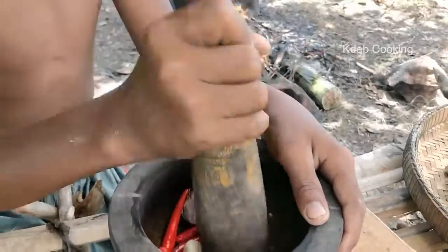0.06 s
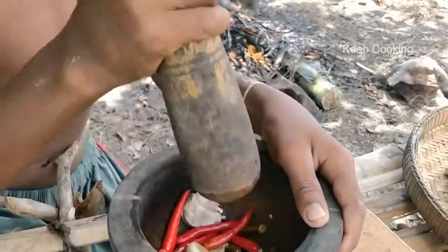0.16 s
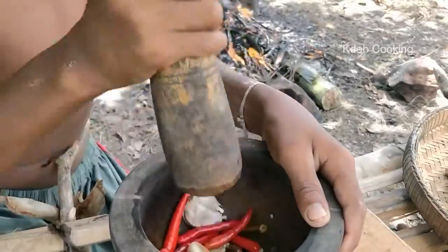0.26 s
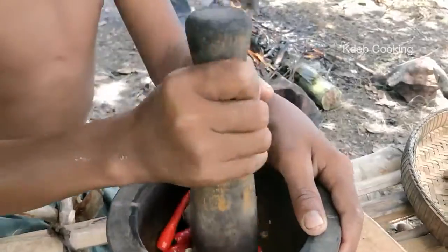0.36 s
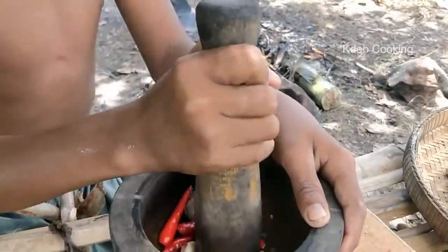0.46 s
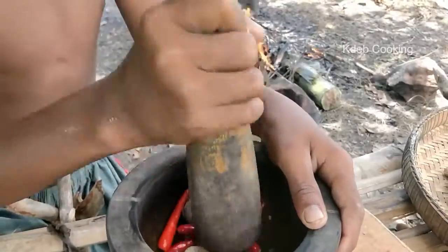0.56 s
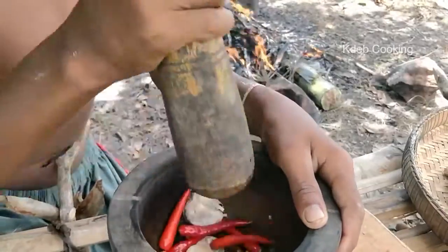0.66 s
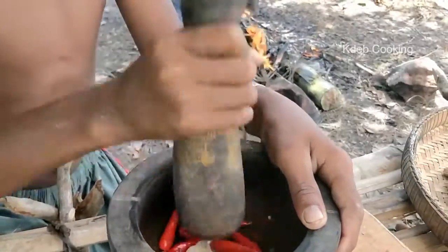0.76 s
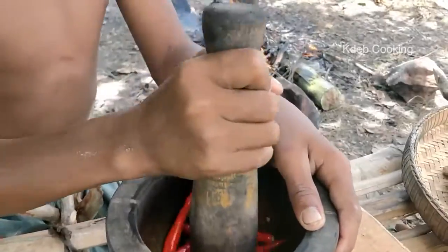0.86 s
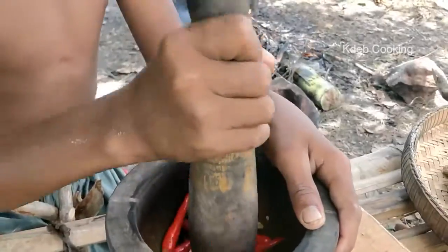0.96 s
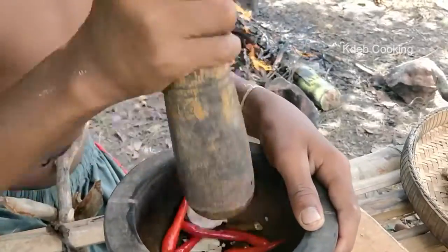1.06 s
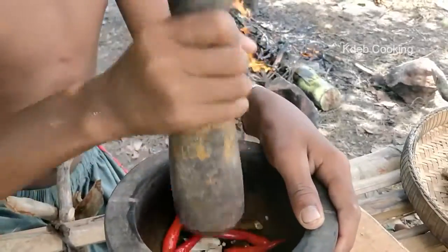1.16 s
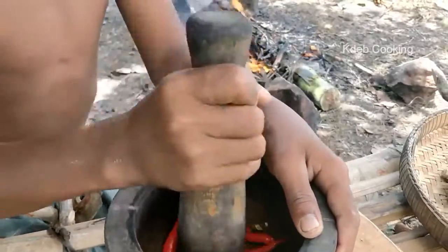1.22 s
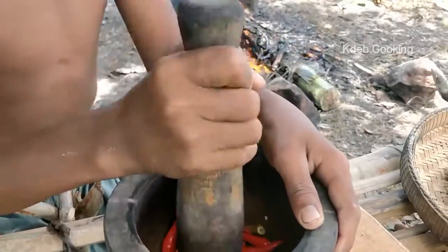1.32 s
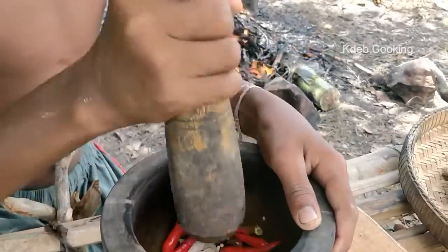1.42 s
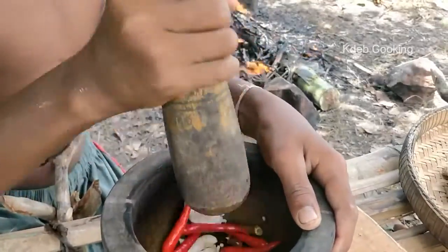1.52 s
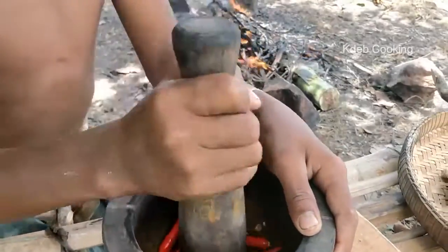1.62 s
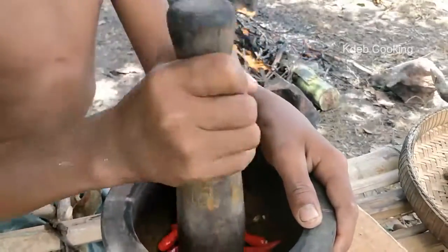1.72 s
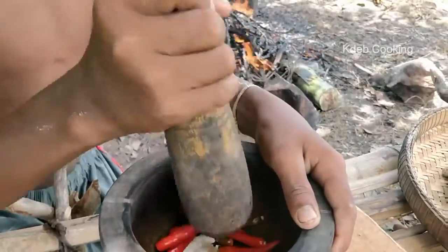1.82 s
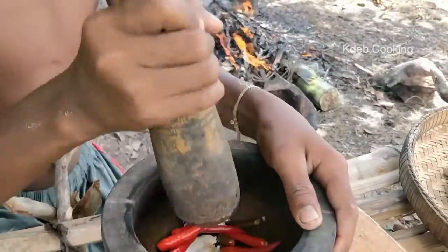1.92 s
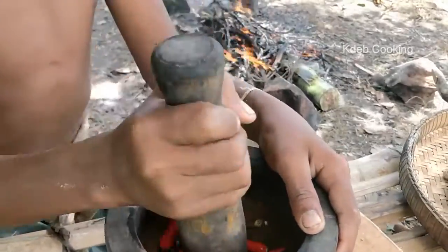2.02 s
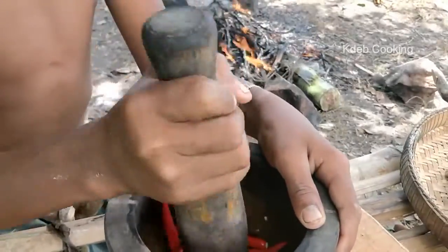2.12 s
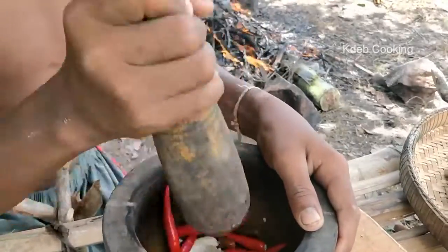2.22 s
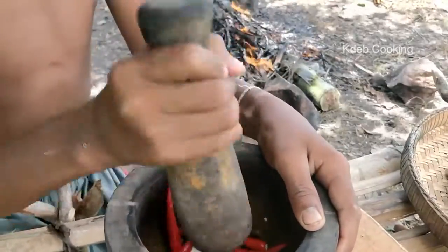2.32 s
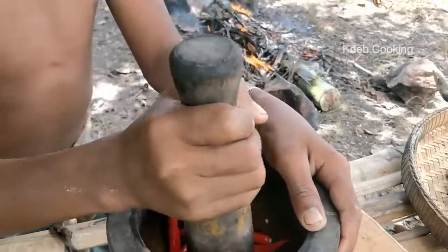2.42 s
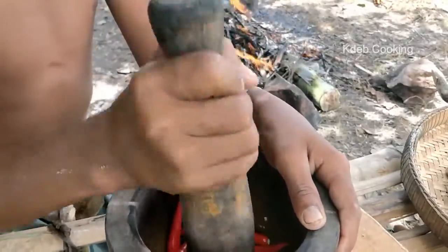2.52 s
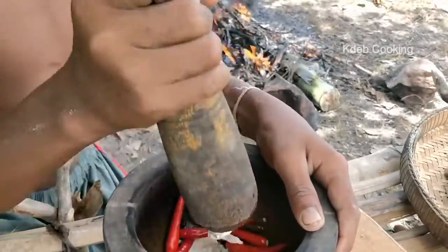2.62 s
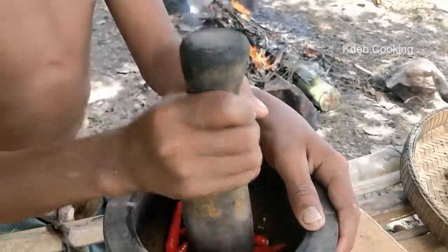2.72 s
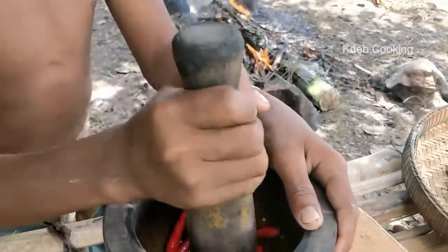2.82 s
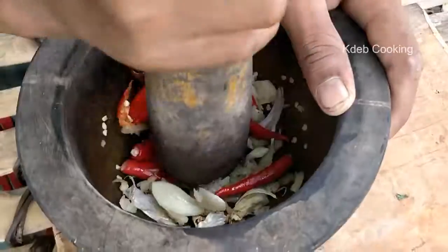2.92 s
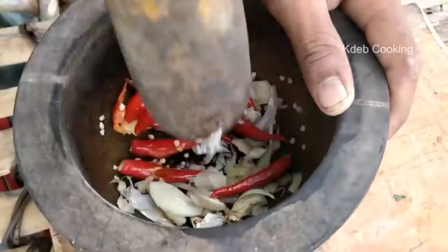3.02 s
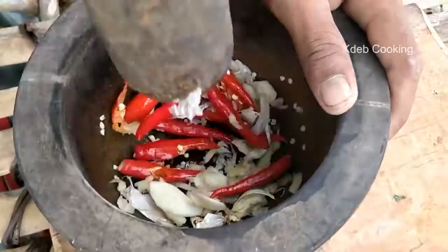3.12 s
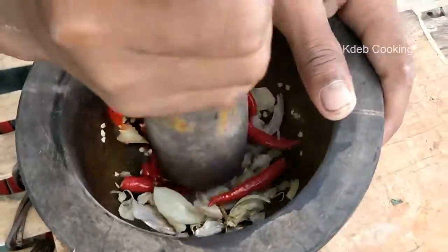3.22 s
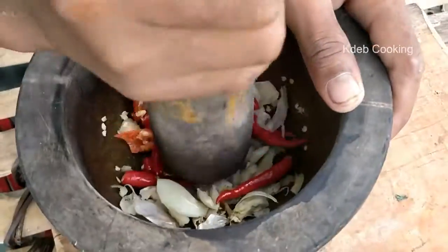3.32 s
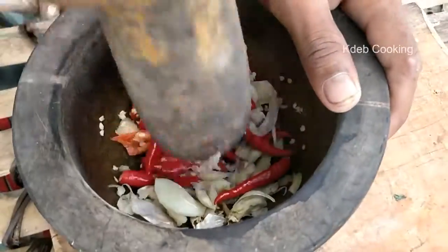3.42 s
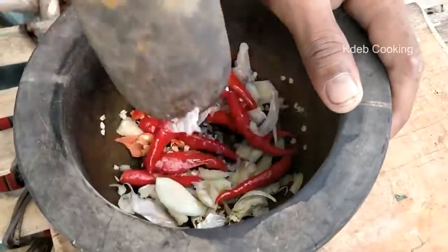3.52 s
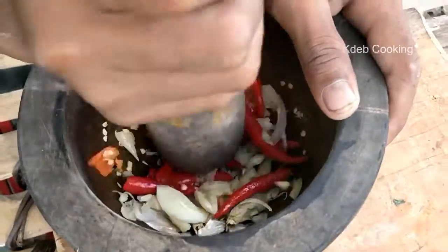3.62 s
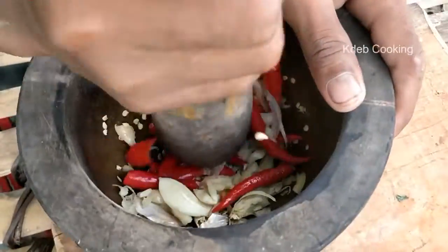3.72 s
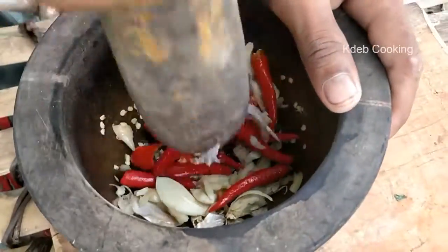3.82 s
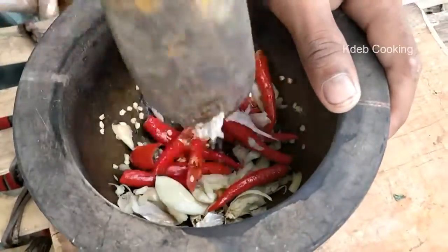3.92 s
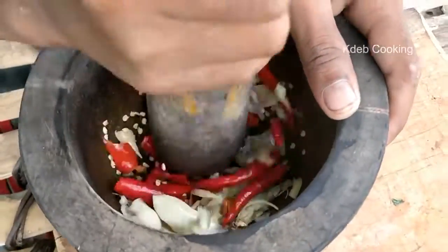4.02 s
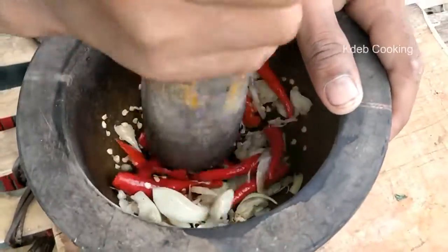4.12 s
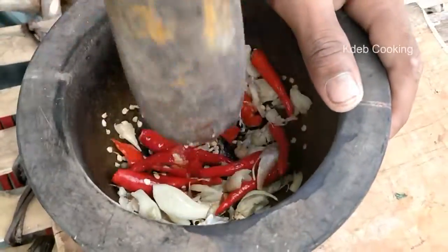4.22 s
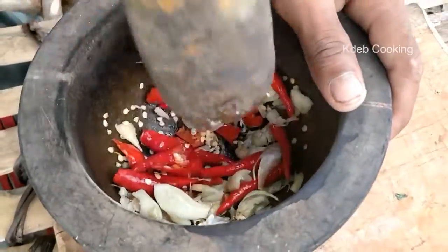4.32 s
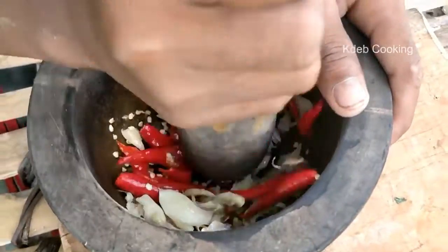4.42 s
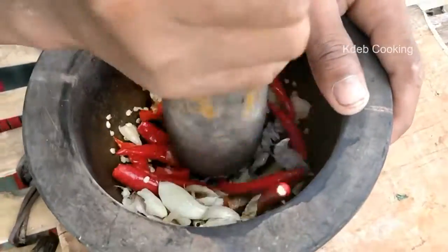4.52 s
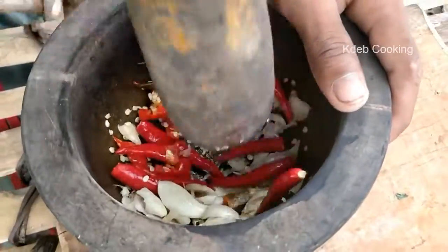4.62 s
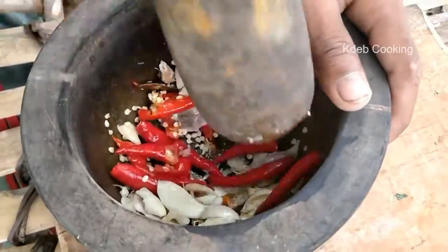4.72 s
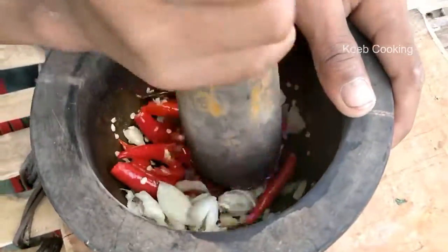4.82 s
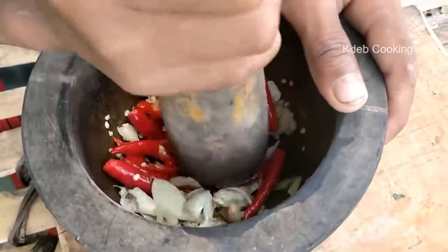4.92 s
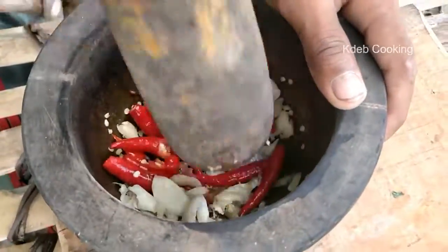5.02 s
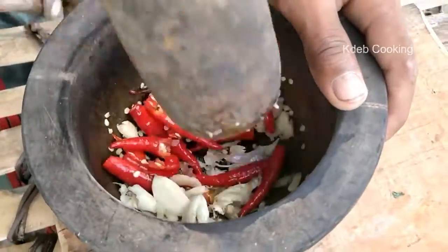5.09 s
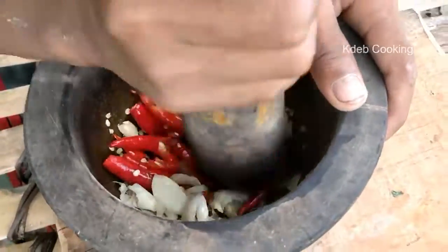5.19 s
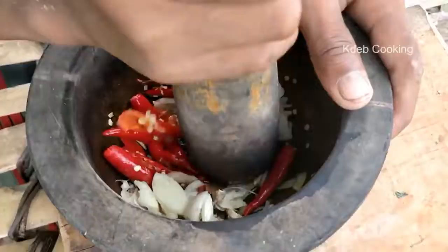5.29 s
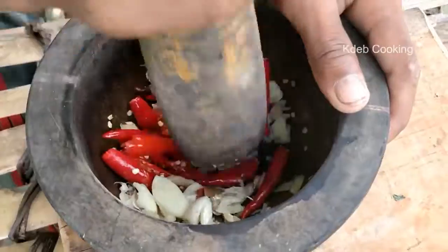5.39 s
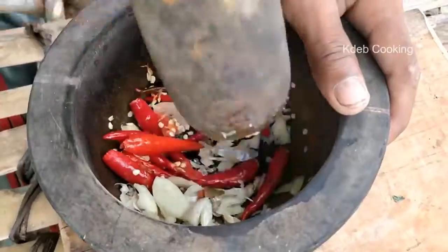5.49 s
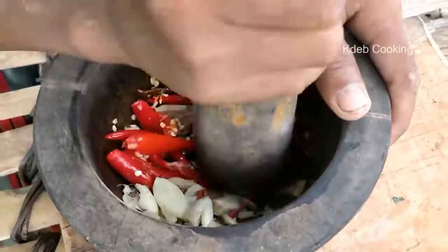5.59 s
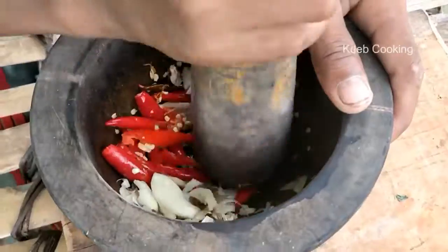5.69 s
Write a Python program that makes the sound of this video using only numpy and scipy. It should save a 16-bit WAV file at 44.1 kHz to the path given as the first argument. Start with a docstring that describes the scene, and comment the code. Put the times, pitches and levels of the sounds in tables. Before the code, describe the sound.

A wooden pestle pounds chillies and garlic in a heavy mortar with steady, crunchy knocks, outdoors with faint hiss and wind on the microphone.

```python
"""A light wooden tap and a thin, fading insect drone open the scene; wind rumbles on the microphone.
A wooden pestle then pounds chillies and garlic in a heavy mortar, outdoors beside a small fire: noise grains
crunch, short tones crack and thump, and decaying modes knock. Filtered noise makes the wind, hiss and sizzle.
Near three seconds the sound drops out briefly; then the mortar is heard from just above its rim."""
import sys
import numpy as np
from scipy import signal
from scipy.fft import rfft, irfft, next_fast_len
from scipy.io import wavfile
from scipy.ndimage import uniform_filter1d

SR = 44100
rng = np.random.default_rng(int(sys.argv[2]) if len(sys.argv) > 2 else 0)


def put_to_file(sound):
    """Save the sound as 16-bit audio at rate SR, in the file named by the first command-line argument."""
    columns = np.atleast_2d(sound).T  # one column per channel
    safe = np.clip(columns, -1, 1)
    whole_steps = np.round(safe * 32767)
    wavfile.write(sys.argv[1], SR, whole_steps.astype(np.int16))


N = 253575
TIME = np.arange(N) / SR
AGE = np.arange(SR // 2) / SR   # time within one sound
BREAK_FROM_S, BREAK_TO_S = 2.912, 2.992


# Pestle strokes. Each row: start in seconds, crunch in relative dB, crunch treble in dB, crack in Hz,
# crack in relative dB, thump in relative dB, knock in relative dB, time to sink through the pods in seconds,
# settling knock in relative dB, time to slip to the bottom of the bowl in seconds.
PESTLE_STROKES = [(0.363, -21.5, -3.5, 4970, -15.5, -29, -13, 0.0074, -15.5, 0.02),
                  (0.8266, -12.5, -1.5, 4400, -6, -38.5, -14, 0.0063, -12, 0.021),
                  (1.2356, -12, 0, 4420, -15.5, -28.5, -16, 0.0075, -23.5, 0.031),
                  (1.628, -6.5, 2, 3210, -8.5, -19, -29, 0.000064, -22.5, 0.024),
                  (2.0236, -10.5, -3, 3410, -20, -17, -13.5, 0.0017, -30, 0.019),
                  (2.4005, -13.5, -6.5, 4560, -6.5, -24, -32, 0.007, -27, 0.012),
                  (2.7762, -9.5, 1.5, 3290, -5, -14, -7, 0.0018, -25, 0.023),
                  (3.2133, -17.5, -0.5, 2300, -24, -31, -6, 0.0081, -6, 0.022),
                  (3.608, -15.5, -3, 2440, -22, -18, -9.5, .0074, -8.5, 0.0205),
                  (4.006, -11.5, -8, 2200, -13, -21.5, -7, 0.0018, -14.5, 0.012),
                  (4.407, -15, -12, 2145, -16, -21.5, -6, 0.00041, -36, 0.014),
                  (4.797, -20.5, -2, 2090, -30, -25.5, -28, 0.0054, -20, 0.019),
                  (5.2119, -11, -1.5, 4480, -11.5, -13.5, -17, 0.00048, -16, 0.0265),
                  (5.604, -8.5, 0, 2240, -12.5, -13.5, -21.5, 0.00036, -21, 0.016)]
THICK_SINK_S, SECOND_BURST_SINKS, SECOND_BURST_DB = 0.011, 1.7, -24.5


def bursts_of_pods():
    """One burst a stroke; a thick layer gives way again, louder the thicker. Rows: s, dB, treble dB, sink s."""
    rows = []
    for start_s, level_db, treble_db, *_, sink_s, _, _ in PESTLE_STROKES:
        rows.append((start_s, level_db, treble_db, max(sink_s, 0)))
        if sink_s > THICK_SINK_S / 2:
            second_s = start_s + SECOND_BURST_SINKS * sink_s
            second_db = SECOND_BURST_DB + 20 * np.log10(sink_s / THICK_SINK_S)
            rows.append((second_s, second_db, treble_db, 2 * sink_s))
    return rows


# Spectrum of bursting pods. Each row: frequency in Hz, relative level in dB.
CRUNCH_SPECTRUM = [(150,-22),(500,0.5),(1200,-1),(2800,-0.5),(5000,-7.5),(8000,-1.5),(11000,-14),(16000,-19.5)]
# Air in the bowl, colouring the crunch. Each row: frequency in Hz, width in Hz, gain in dB.
BOWL_AIR = [(3970,1420,9),(5330,520,14.5)]
SQUEEZE_S, SQUEEZE_PER_SINK = 0.00091, 0.25   # the crunch swells more slowly in a thick layer
TOUCH_LEAD_S, TOUCH_PER_SINK = 0.0045, 0.72   # the tip touches a thick layer earlier


def crunch(level_db=-8, lead_s=0.00097, stop_s=0.0014, ooze_db=-17, ooze_s=0.0094, press_db=-19, apart_db=-8):
    """Skins crackle from first touch, burst together as the pestle closes on them, then ooze briefly."""
    out = np.zeros((2, N))
    before_s = 0.03
    t = AGE - before_s - lead_s
    after = np.maximum(t, 0)
    release = np.exp(-after / stop_s) + from_db(ooze_db) * np.exp(-after / ooze_s)
    for start_s, burst_db, treble_db, sink_s in bursts_of_pods():
        touching = np.clip((t + TOUCH_LEAD_S + TOUCH_PER_SINK * sink_s) * 2000, 0, 1)
        swell_s = max(SQUEEZE_S + SQUEEZE_PER_SINK * sink_s, 1e-4)
        squeeze = np.exp(np.minimum(t, 0) / swell_s)
        envelope = touching * np.maximum(squeeze, from_db(press_db)) * release
        shared = grains(len(t), 3.0)
        separate = from_db(apart_db) * grains((2, len(t)), 0.97)
        burst = colour((shared + separate) * envelope, [(4000, 0), (8000, treble_db)])
        add(out, start_s - before_s, burst * from_db(burst_db + level_db))
    out = colour(out, CRUNCH_SPECTRUM)
    hollow = sum(from_db(db) * resonance(out, hz, width_hz) for hz, width_hz, db in BOWL_AIR)
    return 1.33 * out + hollow


def cracks(decay_cycles=8, rise_s=0.00019, left_db=5.5, waver=0.042):
    """Bursting pods ring the gap between tip and bowl: a short, unsteady note, pitched stroke by stroke."""
    out = np.zeros(N)
    for start_s, _, _, hz, level_db, *_ in PESTLE_STROKES:
        unsteady_hz = hz * (1 + waver * drift(1100)[:len(AGE)])
        note = np.sin(2 * np.pi * np.cumsum(unsteady_hz) / SR)
        envelope = (1 - np.exp(-AGE / rise_s)) * np.exp(-AGE * hz / decay_cycles)
        add(out, start_s, from_db(level_db) * note * envelope)
    return out * from_db([[left_db], [-left_db]])


def thumps(level_db=9.0, hardest_hz=250, cycles=0.58, early_s=0.0019, stiffening=0.25):
    """The cushioned blow shoves the mortar on its table; harder blows pack the pods stiffer and swing faster."""
    out = np.zeros(N)
    hardest_db = max(stroke[5] for stroke in PESTLE_STROKES)
    for start_s, _, _, _, _, thump_db, *_ in PESTLE_STROKES:
        hz = hardest_hz * from_db(stiffening * (thump_db - hardest_db))
        add(out, start_s - early_s, swing(hz, cycles) * from_db(thump_db + level_db))
    return out


def swing(hz, cycles):
    """A shove as one or two swings that swell and die."""
    phase = AGE * hz - 1.5 * cycles
    onset = 1 - np.exp(-AGE * hz * 10)
    return np.cos(2 * np.pi * phase) * np.exp(-(phase / cycles) ** 2) * onset


# Pestle tapping the wall as it rocks and is lifted. Each row: start in seconds, relative level in dB.
WALL_TAPS = [(0.008, -22.5), (0.39, -17.5), (0.8548, -20.5), (1.699, -29.5), (2.102, -21.5), (2.857, -21),
             (3.271, -27.5), (3.663, -25), (3.704, -32), (4.065, -27.5), (4.112, -35.5), (4.468, -36.5),
             (4.561, -37), (4.73, -40.5), (4.911, -40), (5.254, -31), (5.325, -22), (5.374, -35),
             (5.6306, -23.5)]
LANDING_LEAD_S = 0.0007   # the tip meets the bowl just before its sinking time is up
LANDING_RISE_S, RISE_PER_SINK = 0.00018, 0.063   # pods cushion the onset
SLIP_RISE_S, TAP_RISE_S = 0.0015, 0.00063   # glancing contacts build up more slowly
LANDING_TREBLE_DB, KNOCK_TREBLE_SHARE = 3.5, 0.65   # direct blows are brighter; mashed pods dull them


def contacts():
    """Wood meets the bowl by tap, landing and settling slip. Rows: s, dB, rise s, extra treble dB."""
    rows = [(start_s, tap_db, TAP_RISE_S, 0) for start_s, tap_db in WALL_TAPS]
    for start_s, _, treble_db, *_, knock_db, sink_s, settle_db, settle_s in PESTLE_STROKES:
        rise_s = LANDING_RISE_S + RISE_PER_SINK * sink_s
        landing_treble_db = LANDING_TREBLE_DB + KNOCK_TREBLE_SHARE * treble_db
        rows.append((start_s + sink_s - LANDING_LEAD_S, knock_db, rise_s, landing_treble_db))
        rows.append((start_s + settle_s, settle_db, SLIP_RISE_S, 0))
    return rows


# Modes of mortar and pestle. Each row: frequency in Hz, relative level in dB, 60 dB decay in seconds.
BOWL_MODES = [(360,-2,0.053),(425,-7.5,0.042),(771.4,1,0.026),(840.4,-3.5,0.045),(958,-7,0.036),(1194,-6,0.042),(1388,-8.5,0.044),(1899,-9,0.039),(2190,-3,0.015),(3560,-4.5,0.0082)]
# Spectrum of the woody clack. Each row: frequency in Hz, relative level in dB.
CLACK_SPECTRUM = [(80,-48.5),(200,9),(450,5),(1000,-9),(2000,-10.5),(4000,-10.5),(8000,-22.5),(16000,-52)]
MEDIUM_KNOCK_DB, DULLING_PER_DB = -22, 0.35   # heavy knocks land on dull pulp, light ones on bare wood


def knocks(ring_db=-2, clack_db=-10, clack_s=0.018, hard_db=4, thud_db=-3, thud_hz=400,
           free_s=0.0082, pressed_db=-7):
    """Each contact thuds and rings the bowl over a woody clack, until the pestle's weight chokes both."""
    out = np.zeros((2, N))
    hz, mode_db, t60_s = np.transpose(BOWL_MODES)
    upper = np.clip(np.log2(hz / 1200), 0, 1)   # share of each mode that needs a hard contact
    sign = (-1) ** np.arange(len(hz))
    choke = from_db(pressed_db * (1 - np.exp(-(AGE / free_s) ** 4)))
    thud = from_db(thud_db) * swing(thud_hz, 0.5)
    for start_s, level_db, rise_s, treble_db in contacts():
        strength, detune = rng.standard_normal((2, len(hz)))
        hardness_db = hard_db + treble_db - DULLING_PER_DB * (level_db - MEDIUM_KNOCK_DB)
        # the grip and the point of contact shift the modes a little
        mode_hz = hz * (1 + 0.041 * detune)
        waves = np.sin(2 * np.pi * np.outer(mode_hz, AGE)) * from_db(-60 * AGE / t60_s[:, None])
        ring = (from_db(mode_db + ring_db + 2 * strength + upper * hardness_db) * sign) @ waves
        grit = grains(len(AGE), 0.76) + 0.5 * grains((2, len(AGE)), 1.8)
        clack = colour(grit * np.exp(-AGE / clack_s), CLACK_SPECTRUM)
        clack = clack + (from_db(hardness_db) - 1) * cut(clack, 1800, "high", order=1)
        attack = 1 - np.exp(-AGE / max(rise_s, 1e-4))
        add(out, start_s, from_db(level_db) * (thud + attack * choke * (ring + from_db(clack_db) * clack)))
    return cut(out, 9000, "low")   # wood is too soft for the very top


# Modes of the free pestle. Each row: frequency in Hz, relative level in dB, 60 dB decay in seconds.
PESTLE_MODES = [(1270, -6, 0.072), (1815, 4, 0.048), (3760, 3.5, 0.029)]


def pestle_ring(level_db=-21, follows=0.54, hidden_db=-9):
    """Clear of the pulp, the pestle rings freely at each tap, weakly tracking its force; the rim hides the side."""
    out = np.zeros(N)
    for start_s, tap_db in WALL_TAPS:
        for hz, mode_db, t60_s in PESTLE_MODES:
            strength, detune = rng.standard_normal(2)
            wave = np.sin(2 * np.pi * hz * (1 + detune / 60) * AGE)
            wave_db = level_db + follows * tap_db + mode_db + 2 * strength - 60 * AGE / t60_s
            add(out, start_s, wave * from_db(wave_db))
    return out * from_db(np.where(TIME < BREAK_FROM_S, hidden_db, 0))


# Two ports beside the bowl, the left brighter around 7500 Hz. Each row: frequency in Hz, left in dB, right in dB.
SIDE_PORTS = [(2500,-1,-2),(4200,-1,-3.5),(7500,2,-0.5),(11000,-2,-0.5)]
# Two ports facing down into the bowl. Each row: frequency in Hz, left in dB, right in dB.
ABOVE_PORTS = [(407,-1.5,1.5),(1690,-1,-3),(2550,5,-3),(5900,-2.5,-3.5),(8700,1,8.5),(10900,8,-9)]


def placed(x, side_lag_s=0.00007, above_lag_s=0.00017, mouth_hz=800, mouth_width_hz=170):
    """From the side the mortar is nearer the right port; from above nearer the left, with a hollow mouth."""
    side = at_ports([np.roll(x[0], round(side_lag_s * SR)), x[1]], SIDE_PORTS)
    above = at_ports([x[0], np.roll(x[1], round(above_lag_s * SR))], ABOVE_PORTS)
    hollow = above + resonance(above, mouth_hz, mouth_width_hz)
    return np.where(TIME < BREAK_FROM_S, side, hollow)


def at_ports(x, table):
    """Give each port its own colour."""
    hz, *sides_db = np.transpose(table)
    return np.array([equalise(channel, hz, db) for channel, db in zip(x, sides_db)])


# Spectrum of the scattered tail. Each row: frequency in Hz, relative level in dB.
TAIL_SPECTRUM = [(100,13.5),(900,7.5),(4500,-8.5),(8000,-10.5),(11000,-17.5),(16000,-41.5)]


def surroundings(x, near_db=-16, near_s=0.018, far_db=-22, far_s=0.22):
    """Quick scatter from body and table, then a faint uneven tail: diffuse, dying with the energy fed in."""
    power = np.mean(x ** 2, axis=0) + 1e-18
    heard_power = 0
    for level_db, decay_s in ((near_db, near_s), (far_db, far_s)):
        keep = np.exp(-2 / (decay_s * SR))
        heard_power = heard_power + from_db(2 * level_db) * signal.lfilter([1 - keep], [1, -keep], power)
    unevenness = from_db(2.5 * drift(220))
    return colour(grains((2, N), 5.4), TAIL_SPECTRUM) * np.sqrt(heard_power) * unevenness


# Small dry snaps of twigs and skins. Each row: start in seconds, relative level in dB.
DRY_SNAPS = [(0.635, -2.5), (0.6468, -7), (0.678, -13.5), (2.374, -10.5), (2.901, -14.5)]
# Spectrum of a snap. Each row: frequency in Hz, relative level in dB.
SNAP_SPECTRUM = [(100,-12.5),(400,7),(6000,-15),(12000,-22.5),(16000,-49)]


def snaps(splinter_db=-27, decay_s=0.0024):
    """Tiny brittle breaks: one sharp pulse and a trace of splintering."""
    out = np.zeros((2, N))
    for start_s, level_db in DRY_SNAPS:
        snap = from_db(splinter_db) * rng.standard_normal((2, len(AGE))) * np.exp(-AGE / decay_s)
        snap[:, 0] -= 1
        add(out, start_s, snap * from_db(level_db))
    return colour(out, SNAP_SPECTRUM)


# Spectrum of dry brushing. Each row: frequency in Hz, relative level in dB.
RUSTLE_SPECTRUM = [(500,1),(7500,-1),(16000,-15)]


def rustle(level_db=-21.5, swell_db=15, start_s=0.47, stop_s=0.682):
    """A dry brushing swells around the first snaps and stops short."""
    progress = (TIME - start_s) / (stop_s - start_s)
    flutter_db = 2.5 * drift(150)
    swell = from_db(level_db + swell_db * (np.clip(progress, 0, 1) - 2.5) + flutter_db)
    gate = np.clip(4 * progress, 0, 1) * (progress < 1)
    return colour(grains((2, N), 5.0), RUSTLE_SPECTRUM) * swell * gate


# Spits of the fire. Each row: start in seconds, level in dB before the high-pass.
FIRE_SPITS = [(2.466, -29.5)]


def spits(decay_s=0.0022, above_hz=7500):
    """The fire spits: a thin, very high tick of decaying noise."""
    out = np.zeros((2, N))
    for start_s, level_db in FIRE_SPITS:
        tick = rng.standard_normal((2, len(AGE))) * np.exp(-AGE / decay_s)
        add(out, start_s, tick * from_db(level_db))
    return cut(out, above_hz, "high")


# Breeze. Each row: time in seconds, relative rumble level in dB.
WIND_GUSTS = [(0.0, -39), (0.2, -47.5), (0.43, -36), (0.68, -45.5), (1.0, -44), (1.45, -53), (1.7, -47.5),
              (2.25, -46), (2.62, -32.5), (2.73, -45.5), (2.87, -36), (3.02, -41), (3.43, -25), (3.51, -34),
              (3.56, -25), (3.67, -29.5), (3.75, -25), (3.95, -32.5), (4.04, -26), (4.24, -22),
              (4.48, -37.5), (5.05, -36), (5.5, -30.5), (5.75, -38.5)]
# Spectrum of turbulence. Each row: frequency in Hz, relative level in dB.
WIND_SPECTRUM = [(15, -43.5), (25, -8.5), (140, -1.5), (300, -10), (484, -21.5), (1200, -42), (2200, -99)]


def wind(level_db=4, calm_hz=300, shared=0.31, side_db=2):
    """Lumpy turbulence at each port; stronger lumps reach higher in pitch."""
    gust_db, = in_time(WIND_GUSTS)
    noise = rng.standard_normal((2, N)) + shared * rng.standard_normal(N)
    eddies = rms_one(cut(colour(noise, WIND_SPECTRUM), 2000, "low"))
    low = cut(eddies, calm_hz, "low", order=1)
    lumps_db = 1.3 * np.array([drift(70), drift(70)]) + 1.1 * drift(50)
    reach = from_db(2 * lumps_db)   # small eddies come in bursts
    windward_db = side_db * (TIME < BREAK_FROM_S) * np.array([[1], [-1]])
    return (low + reach * (eddies - low)) * from_db(gust_db + level_db + windward_db + lumps_db)


# Single eddies striking the microphone. Each row: start in seconds, level in dB, mean pitch in Hz.
EDDY_BUFFETS = [(0.036, -17.5, 172), (2.634, -12.5, 197), (3.375, -12.5, 255), (3.421, -7.5, 123)]


def buffets(t60_s=0.028):
    """An eddy gives one soft low bump, a little different at each port."""
    out = np.zeros((2, N))
    for start_s, level_db, hz in EDDY_BUFFETS:
        port_hz = hz * from_db(0.5 * rng.standard_normal((2, 1)))
        add(out, start_s, np.sin(2 * np.pi * port_hz * AGE) * from_db(level_db - 60 * AGE / t60_s))
    return cut(out, 620, "low")


# Spectrum of outdoor hiss. Each row: frequency in Hz, relative level in dB.
YARD_SPECTRUM = [(60,-29),(300,10.5),(1500,2.5),(7500,-3.5),(11000,-17),(15500,-31.5)]
# Spectrum of the fire. Each row: frequency in Hz, relative level in dB.
SIZZLE_SPECTRUM = [(4000,-20),(11500,0),(13500,-6),(16000,-18)]
# Fire flaring and sinking. Each row: time in seconds, sizzle in dB just after a stroke.
FIRE_LEVELS = [(0.0, -89), (1.0, -66.5), (2.7, -60.5), (3.0, -81), (5.75, -75)]
HISS_DB, SINK_DB_PER_S = -47.5, 17   # level just after a stroke
HISS_DIP_DB, DIP_S = -19, 0.18   # the hiss dips around the break


def air():
    """Wide crackling hiss and fine fire sizzle; both step up with each stroke and sink until the next."""
    sizzle_db, = in_time(FIRE_LEVELS)
    starts_s = np.array([0] + [start_s for start_s, *_ in PESTLE_STROKES])
    latest_s = starts_s[np.searchsorted(starts_s, TIME, "right") - 1]
    sinking_db = -SINK_DB_PER_S * (TIME - latest_s)
    away = np.maximum(BREAK_FROM_S - TIME, TIME - BREAK_TO_S) / DIP_S
    hiss_db = HISS_DB + HISS_DIP_DB * (1 - np.clip(away, 0, 1) ** 2)
    crackle_db = 1.3 * drift(14) + 1.8 * drift(120)
    yard = colour(grains((2, N), 6.5), YARD_SPECTRUM) * from_db(hiss_db + crackle_db)
    sizzle = colour(grains((2, N), 3.0), SIZZLE_SPECTRUM) * from_db(sizzle_db)
    return (yard + sizzle) * from_db(sinking_db)


def insects(hz=5080, width_hz=650, level_db=-57.5, fade_s=0.9):
    """A thin, far insect drone, noise through two equal resonances, that dies away."""
    once = resonance(rng.standard_normal((2, N)), hz, width_hz)
    drone = rms_one(resonance(once, hz, width_hz))
    return drone * from_db(level_db + 2 * drift(31)) * np.exp(-(TIME / fade_s) ** 2)


def from_db(db):
    """Decibels to gain."""
    return 10 ** (np.asarray(db) / 20)


def rms_one(x):
    """Scale to unit power."""
    return x / np.sqrt(np.mean(x ** 2) + 1e-20)


def in_time(rows):
    """Each column of a curve at every sample."""
    s, *columns = np.transpose(rows)
    return [np.interp(TIME, s, column) for column in columns]


def colour(x, spectrum):
    """Shape by (Hz, dB) points; white noise keeps its power."""
    return equalise(x, *np.transpose(spectrum), keep_power=True)


def equalise(x, hz, db, keep_power=False):
    """Shape by a spectrum interpolated in dB over log frequency."""
    size = next_fast_len(x.shape[-1] + 1024)
    bins_hz = np.maximum(np.fft.rfftfreq(size, 1 / SR), 1)
    gain = from_db(np.interp(np.log(bins_hz), np.log(hz), db))
    if keep_power:
        gain = rms_one(gain)
    return irfft(rfft(x, size) * gain, size)[..., :x.shape[-1]]


def cut(x, hz, kind, order=2):
    """Low- or high-pass."""
    return signal.sosfilt(signal.butter(order, hz, kind, fs=SR, output="sos"), x + 1e-18)


def resonance(x, hz, width_hz):
    """A band that rings; gain about one at its peak."""
    r = np.exp(-np.pi * width_hz / SR)
    zeros = np.array([1, 0, -1]) * (1 - r * r) / 2
    poles = [1, -2 * r * np.cos(2 * np.pi * hz / SR), r * r]
    return signal.lfilter(zeros, poles, x + 1e-18)


def drift(rate_hz):
    """Random points at a given rate, joined by lines; spread near one."""
    count = int(N / SR * rate_hz) + 2
    return np.interp(TIME * rate_hz, np.arange(count), rng.standard_normal(count))


def grains(shape, spread_db):
    """Dense clicks of uneven size, unit power."""
    clicks = rng.standard_normal(shape)
    size_db = spread_db * np.minimum(rng.exponential(1, shape), 4)
    return rms_one(clicks * from_db(size_db))


def add(out, start_s, sound):
    """Mix a sound in from a start time."""
    start = max(round(start_s * SR), 0)
    out[..., start:start + sound.shape[-1]] += sound[..., :N - start]


def scene():
    """Pounding with its echoes, small snaps, and the open air."""
    direct = placed(crunch() + cracks() + thumps() + knocks() + pestle_ring())
    pounding = direct + surroundings(direct)
    small_sounds = snaps() + rustle() + spits()
    return pounding + small_sounds + wind() + buffets() + air() + insects()


def record(dry, top=0.8, break_db=-73, cutoff_hz=16000):
    """The sound drops out briefly, peaks are rounded, the top is cut."""
    outside_break = (TIME < BREAK_FROM_S) | (TIME > BREAK_TO_S)
    running = uniform_filter1d(1.0 * outside_break, size=128)
    rounded = top * np.tanh(dry * np.maximum(running, from_db(break_db)) / top)
    return signal.sosfilt(signal.ellip(10, 0.1, 90, cutoff_hz, fs=SR, output="sos"), rounded)


dry = scene()
out = record(dry)
put_to_file(out)
```